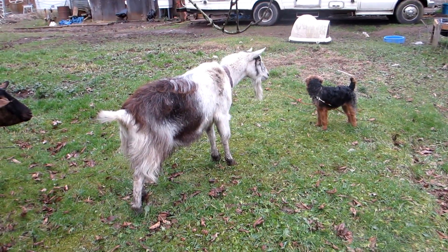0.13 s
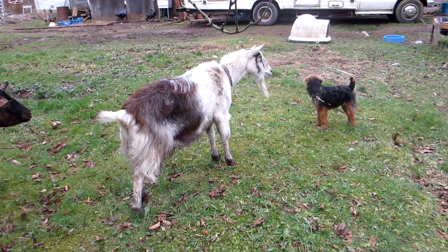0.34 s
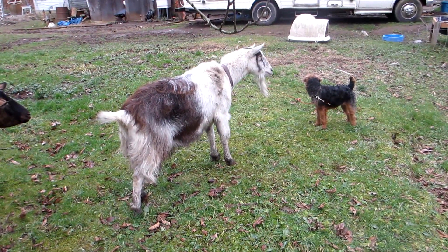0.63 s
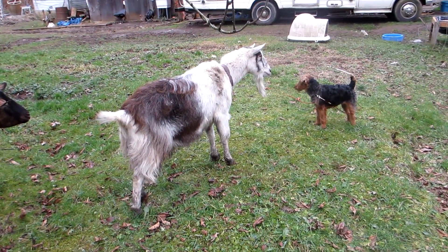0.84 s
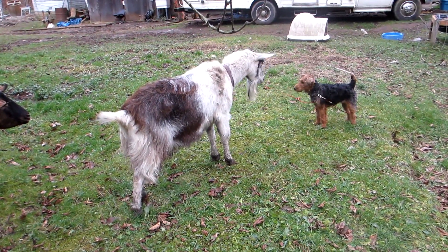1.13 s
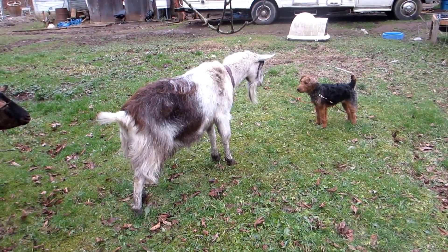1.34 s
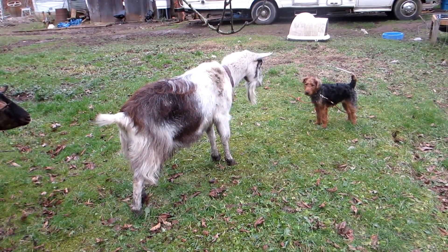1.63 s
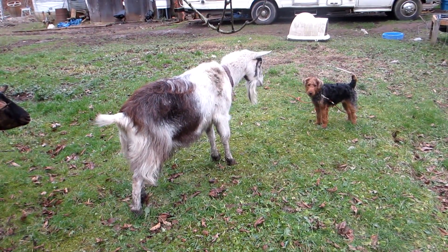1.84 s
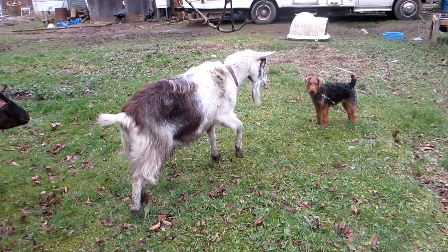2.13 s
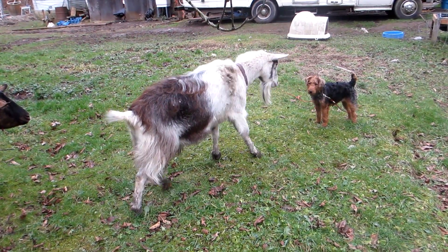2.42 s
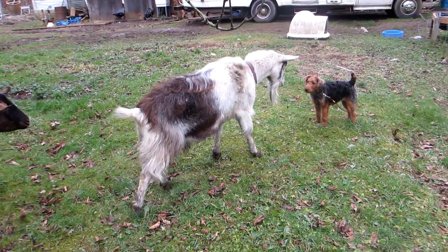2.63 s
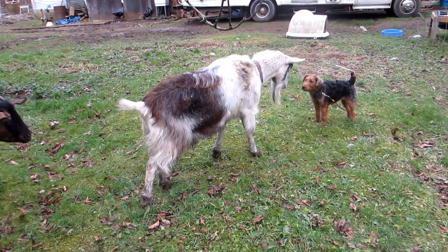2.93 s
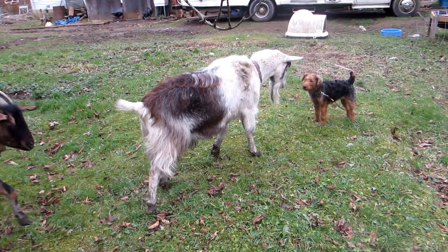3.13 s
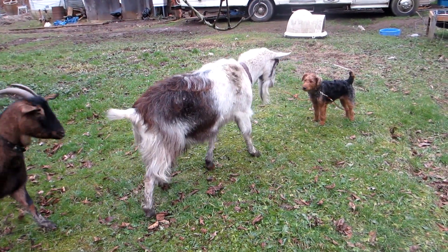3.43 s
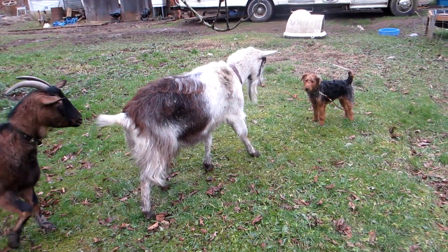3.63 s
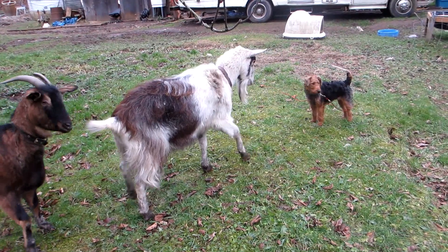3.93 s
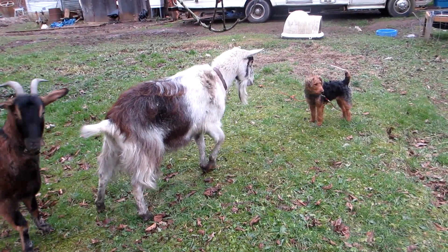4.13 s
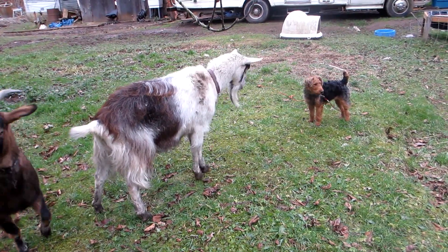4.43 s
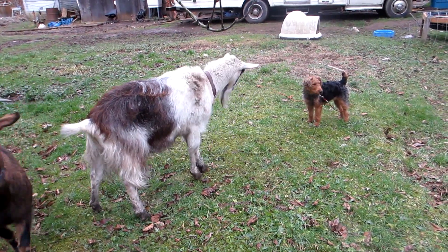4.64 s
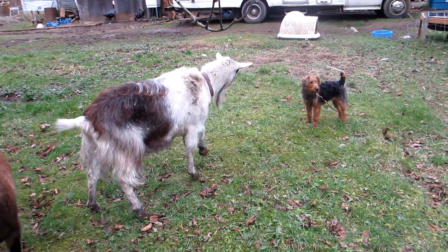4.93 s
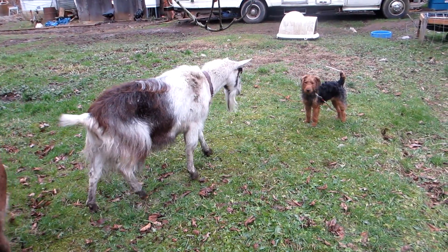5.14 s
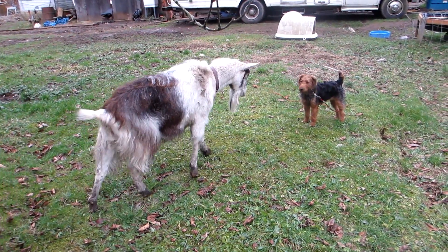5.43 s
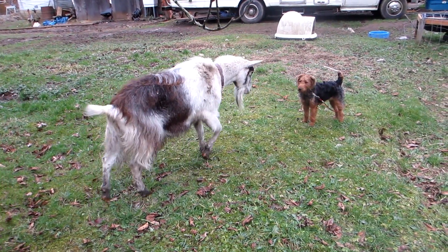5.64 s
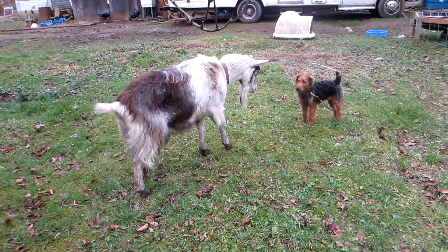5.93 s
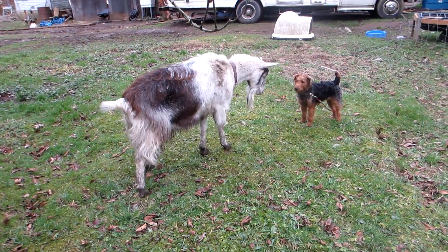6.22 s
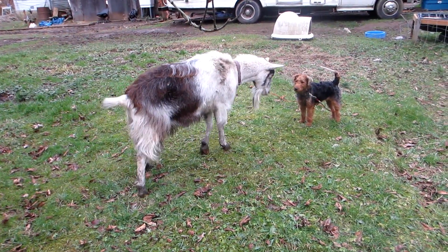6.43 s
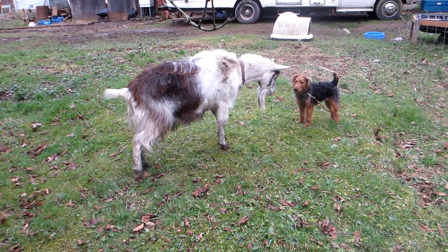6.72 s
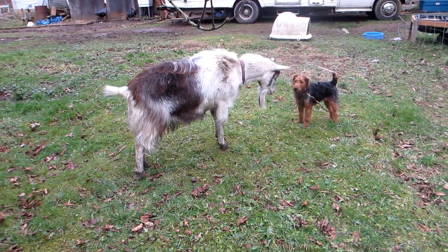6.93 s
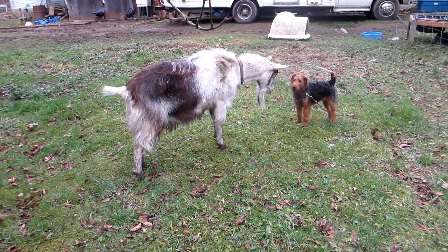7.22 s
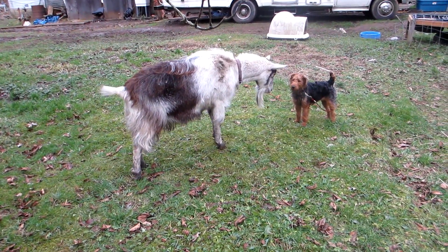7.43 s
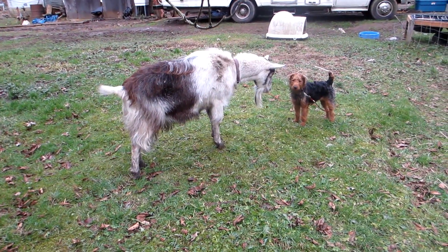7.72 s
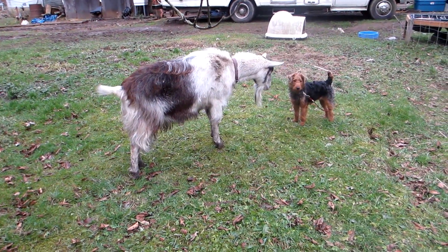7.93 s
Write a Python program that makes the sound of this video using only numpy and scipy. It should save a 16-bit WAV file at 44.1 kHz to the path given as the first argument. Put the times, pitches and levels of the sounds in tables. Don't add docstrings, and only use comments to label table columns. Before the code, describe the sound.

A heavy truck beyond a farmyard pulls hard, shifts up twice and settles to a lower drone while goats rustle grass and snap dry leaves nearby.

```python
import sys
import numpy as np
from scipy import signal
from scipy.io import wavfile
from scipy.ndimage import uniform_filter1d

SR = 44100
rng = np.random.default_rng(int(sys.argv[2]) if len(sys.argv) > 2 else 0)


def gain_from_db(level_db):
    decades = np.asarray(level_db, float) / 20
    return 10 ** decades


def inscribe(sig):
    pcm = np.round(np.clip(np.atleast_2d(sig).T, -1, 1) * 32767)
    wavfile.write(sys.argv[1], SR, pcm.astype(np.int16))


N = 355446
T = np.arange(N) / SR

# time in seconds, firing rate in Hz.
ENGINE = [(0, 82.54), (0.42, 91.7), (0.73, 96.25), (0.87, 90.45), (1.14, 73.1), (1.4, 62.2), (1.67, 56.28),
          (2.03, 58.23), (3.14, 71.9), (3.87, 82.15), (4.63, 90.5), (5.43, 98), (6.06, 65), (6.31, 57.97),
          (6.49, 59.4), (6.7, 69.94), (7.0, 65.96), (8.06, 68.7)]
# opening in seconds, shutting in seconds.
PULLS = [
    (-1, .8),
    (1.95, 5.3),
    (6.5, 9),
]


def exhaust():
    # time in seconds, level in dB.
    load_rows = [(0, -13.5), (.45, -5), (.75, -4), (1, -5.5), (1.7, -8.5), (2.05, -2), (2.6, -5),
                 (3.3, -4.5), (3.8, -2), (4.6, -1), (5.38, -1), (5.5, -4), (6.1, -16), (6.7, -11),
                 (8.06, -16)]
    # time in seconds, level in dB.
    boom_rows = [(0, -23.5), (.4, -28.5), (.7, -33.5), (.81, -25), (1.3, -24.5), (1.6, -32), (1.93, -34),
                 (2.15, -28), (2.58, -21), (3.5, -20.5), (4.1, -20), (4.6, -27.5), (4.95, -20.5),
                 (5.5, -22), (6.2, -25), (6.67, -21), (7.3, -21), (8.06, -31)]
    # time in seconds, change in dB, spread in seconds.
    fade_rows = [(.49, -17, 0.051), (.75, -15, .015), (.87, -5.5, .025), (.99, -3.5, .02), (1.1, -7, 0.016),
                 (1.38, 0.5, .02), (1.48, -2, 0.017), (1.59, -2, .015), (3.67, -11.5, 0.052),
                 (4.48, -5.5, 0.036), (5.19, -9, 0.095), (5.38, -4, 0.046), (5.53, -6, 0.017),
                 (5.65, -4, .015), (5.825, -15, 0.02), (5.96, -1.5, .03), (6.04, 6, 0.022),
                 (3.22, -0.5, .06), (1.93, -1, 0.023), (1.68, -8, .02), (4.75, -2, .05),
                 (6.12, -8.5, 0.018), (6.37, -8.5, 0.014), (6.48, -8.5, 0.083), (6.8, -3, 0.0269),
                 (7.32, -3, 0.03), (7.54, -2, 0.031), (7.8, -0.5, 0.037), (7.93, -6, 0.028)]
    # frequency in Hz, gain in dB.
    silencer = [(110, -3), (153, 5.5), (185, -5.5), (212, -3.5), (268, 3.5), (300, -3), (400, -.5)]
    # multiple of the firing rate, level in dB.
    upper_orders = [(.5, -18), (1.5, 5), (2.5, -1.5), (3.5, -11.5), (4, 0.5), (4.5, -10), (5, -2.5)]
    # time in seconds, order, change in dB, spread
    # in seconds.
    patch_rows = [(0.36, 2, -6, 0.24), (1.097, 2, -6, 0.095), (1.36, 2, 5, 0.041), (1.9, 2, -8, 0.068),
                  (2.65, 2, -7, 0.082), (3.37, 2, 3, 0.21), (3.8, 2, -5.5, 0.04), (2.97, 2, -7, .05),
                  (4.3, 2, -3, 0.071), (5.72, 2, -4.5, 0.087), (7.43, 2, -6, 0.53), (.1, 3, -4, 0.091),
                  (.48, 3, 4, 0.15), (2.65, 3, 1, 0.22), (3.4, 3, 9.5, 0.043), (4.51, 3, 3, 0.071),
                  (4.7, 3, -4.5, 0.062), (8, 3, 3.5, 0.35), (0.57, 2.5, 4.5, 0.31), (2.4, 4, -11, 0.37),
                  (3.95, 4, 2.5, 0.13), (4.75, 4, 2.5, 0.12), (4.8, 4, -3, 0.089), (3.703, 5, 4.5, 0.11),
                  (5.1, 5, -3.5, 0.12), (7.4, 3, 6, 0.1), (0.87, 2, 2.5, .08), (1.8, 4, 6.5, .1),
                  (5.95, 4, -3, .1), (5.47, 4, 1, .2), (5.25, 4.5, 29, 0.17), (1.7, 2.5, -10, .08),
                  (2.6, 3, -1, 0.023), (2.9, 4, -6, .12), (3.5, 5, -7, 0.26), (.15, 2.5, -12, 0.092),
                  (8.8, 4, 6, .3), (7.7, 4, -5, .1), (2.124, 4, 7.5, 0.11), (2.48, 2, 2.5, 0.064),
                   (2.7, 4, -6, .08), (6.8, 5, 13, .5), (7.75, 3, 6, 0.34), (0.71, 4, 1.5, 0.11),
                   (0.28, 4, 8, .1), (0.69, 3, -1, .04), (1.01, 3, -4.5, .07), (1.8, 3, -5, .1),
                   (1.545, 3, 8.5, 0.075), (1.45, 4, 8.5, .12), (2.356, 3, 6, 0.09), (4.5, 4, 2, .06),
                   (5.1, 3, -4, 0.044), (4.09, 4, -4.5, 0.12), (2.9, 4, 7, .15), (3.4, 2, 0.5, .1),
                   (3.5, 3, 0.5, .1),
                  (.5, 1.5, -6.5, 0.51), (1.8, 1.5, -5.5, 0.26), (2.75, 1.5, 6, 0.17), (4.37, 2, 7, 0.054),
                   (2.07, 2, 4, 0.047), (4.0, 2, 2.5, 0.049), (4.6, 2, -4, 0.074), (5.25, 2, -6, .05),
                   (4.43, 3, 1.5, 0.067), (2.8, 3, -7, .04), (3.65, 3, -6, .025), (4.35, 4, -6, 0.096),
                   (3.33, 4, -9, .08), (.03, 4, -10, .1), (3.8, 4, 4, 0.044), (4.55, 5, 4, .08),
                   (4.92, 5, 3.5, .08), (2.85, 1, 1, 0.13), (2.7, 2, -2, .04), (3.89, 4, 2.5, .1),
                   (4.7, 4, 3, 0.074), (6.35, 2, 5, .1), (6.72, 3, 5, .1), (6.2, 2, 6, .04),
                   (6.92, 3.5, 22.5, .05), (6.55, 3.5, 19, .08), (5.6, 3, -6.5, .08), (5.98, 4, -6, .05),
                   (8, 4, -6, .08)]

    firing_hz, load_db = curves(ENGINE, T)[0], curves(load_rows, T)[0]
    turns = np.cumsum(firing_hz) / SR
    whole_db = -40 + 1.63 * load_db
    half_db = -44.5 - 12 * ramp(T, 3.4, 4.1)
    orders = [(1, curves(boom_rows, T)[0] + bumps(fade_rows))]
    for k, full_load_db, load_share in ((2, -30.5, 0.9), (3, -34, 1.04)):
        orders.append((k, full_load_db + load_share * load_db + read(silencer, k * firing_hz)))
    for k, db in upper_orders:
        pipe_db = 3 * np.exp(-(np.log(k * firing_hz / 245) / 0.073) ** 2)
        base_db = half_db if round(2 * k) % 2 else whole_db
        orders.append((k, db + base_db + pipe_db))

    slope_hz_per_s = uniform_filter1d(np.gradient(firing_hz), size=4000) * SR
    coasting = np.clip(-slope_hz_per_s / 25, 0, 1)
    out = np.zeros((2, N))
    for k, db in orders:
        ragged = coasting * (k > 1)
        flutter_db = (.4 * k + 2.2 * ragged) * drift(top_hz=14) - 4 * ragged
        phase = 2 * np.pi * (k * turns + rng.random()) + (.05 * k + .7 * ragged) * drift(top_hz=9)
        skew = 0.13 * np.sqrt(k) * (1 + 0.62 * drift(top_hz=6.7))
        order_changes = patch_rows
        change_db = bumps([(s, d, spread) for s, order, d, spread in order_changes if round(2 * order) == 2 * k])
        out += np.sqrt(2) * gain_from_db(db + flutter_db + change_db) * np.cos(phase + np.outer([1, -1], skew))
    return out


def thumps():
    # start in seconds, peak in dB, frequency in Hz, t60 in seconds.
    thump_rows = [
        (0.771, -26, 69, 0.36),
        (5.432, -23, 59, 0.46),
    ]
    out = np.zeros(N)
    for s, db, hz, t60_s in thump_rows:
        t = np.maximum(T - s, 0)
        attack = 1 - np.exp(-t / 0.0057)
        out += gain_from_db(db - 60 * t / t60_s) * attack * np.sin(2 * np.pi * hz * t)
    return out


def rasp():
    # multiple of the firing rate, level in dB.
    high_orders = [(6, -52.5), (7, -55), (8, -55), (9, -54), (10, -53)]
    # middle in seconds, dB, spread in seconds, centre in Hz, width in Hz.
    rush_rows = [
        (0, -67, 0.061, 3700, 6000),
        (1, -77, .4, 5500, 4000),
        (3, -60, 0.59, 2100, 380),
        (3, -66.5, 0.087, 2900, 1200),
        (5.08, -48, 0.13, 910, 130),
        (0.02, -52, .08, 1100, 350),
        (0.8, -53, 0.14, 1046, 130),
        (5.5, -53.5, 0.17, 1640, 200),
        (7, -54, .35, 1000, 290),
    ]
    firing_hz = curves(ENGINE, T)[0]
    turns, slack_hz = np.cumsum(firing_hz) / SR, 98 - firing_hz
    shut_db = -9 * (1 - throttle(T))
    gate = 0.35 + 0.65 * 2 * np.cos(np.pi * turns) ** 4
    out = gain_from_db(-53 + shut_db + 1.9 * drift(top_hz=6.2)) * band(910, 380) * gate
    for k, db in high_orders:
        phase = 2 * np.pi * k * turns + .8 * drift(top_hz=9)
        out += gain_from_db(db - 0.4 * slack_hz + shut_db + 2.9 * drift(top_hz=10)) * np.cos(phase)
    for s, db, spread, centre_hz, width_hz in rush_rows:
        out += bumps([(s, gain_from_db(db), spread)]) * band(centre_hz, width_hz)
    return out


def gear_whine():
    # time in seconds, frequency in Hz.
    mesh_rows = [(0, 1430), (.2, 1480), (.45, 1550), (.76, 1625), (.86, 1540), (.96, 1432), (1.1, 1385),
                 (1.67, 950), (2.03, 985), (3.14, 1215), (3.9, 1365), (4.2, 1430), (4.6, 1530),
                 (4.95, 1605), (5.25, 1655), (5.45, 1680), (6.2, 1000), (8.06, 1140)]
    # frequency in Hz, level in dB.
    casing = [(1000, -65), (1110, -55), (1200, -62), (1330, -63), (1400, -50), (1460, -49.5), (1550, -51),
              (1650, -58)]
    # time in seconds, change in dB, spread in seconds.
    swell_rows = [(.17, 4, 0.046), (.25, -6, .025), (.87, -5, .04), (.36, -1.5, .1), (4.28, -4, .03),
                  (.55, -3, 0.089), (.78, 1.5, .04), (.97, 8, .04), (1.08, 4, .05), (3.7, -5, 0.13),
                  (4.15, -0.5, 0.055), (4.36, 5, .025), (4.55, -1.5, 0.081), (4.75, 3.5, .06),
                  (5.15, 4, .08), (.68, 1, 0.053)]
    gear_hz = uniform_filter1d(curves(mesh_rows, T)[0], size=2000)
    fuzz = resonate(resonate(rng.standard_normal(N), gear_hz, 70), gear_hz, 70)
    tone = np.cos(2 * np.pi * np.cumsum(gear_hz) / SR)
    whine_db = read(casing, gear_hz) - 12 * (1 - throttle(T)) - 12 * (T > PULLS[-1][0])
    waver_db = .8 * drift(top_hz=10) - 1.5 + bumps(swell_rows)
    return gain_from_db(whine_db + waver_db) * (.9 * evened(fuzz) + .65 * tone)


def turbo():
    # start in seconds, peak in seconds, gone in seconds, peak level in dB.
    spool_rows = [
        (-.2, 0.748, 1.2, -77.5),
        (2.2, 2.6, 5.9, -72),
    ]
    idle_db, hold_s = -86, 1.2
    level_db = idle_db * np.ones(N)
    for s, top, end, db in spool_rows:
        spool_down = ramp(T, min(top + hold_s, end - .2), end)
        level_db += (db - idle_db) * (ramp(T, s, top) - spool_down)
    hiss = rng.standard_normal((2, N)) + .8 * rng.standard_normal(N)
    return gain_from_db(level_db) * evened(resonate(resonate(hiss, 6200, 800), 6200, 800))


def intake():
    # middle in seconds, level in dB.
    vent_rows = [
        (.97, -63),
        (5.73, -60.5),
    ]
    slack_hz = 98 - curves(ENGINE, T)[0]
    rush = gain_from_db(-69 - 0.5 * slack_hz) * band(3200, 450)
    vent_s = 0.11
    return rush + bumps([(s, gain_from_db(db), vent_s) for s, db in vent_rows]) * band(2560, 600)


def road():
    # time in seconds, level in dB.
    roar_rows = [(0, -40), (.2, -43.5), (1, -42.5), (1.7, -46), (2.3, -45.5), (3, -45), (5, -41),
                 (5.75, -42.5), (7.1, -43), (8.06, -43.5)]
    # frequency in Hz, density in dB per Hz.
    roar_spectrum = [(12, -34.5), (20, -24.5), (47, -18.5), (69, -7), (103, -3.5), (164, -10.5),
                     (230, -8.5), (413, -13), (900, -21.5), (1400, -25), (1920, -32), (3000, -44),
                     (4000, -54.5), (6500, -66.5)]

    def roar_db(hz, t):
        bright_db_per_octave = 2 - 0.75 * t + 1.5 * throttle(t)
        bright_db = bright_db_per_octave * np.clip(np.log2(hz / 1500 + 1e-9), 0, 1.1)
        mid_cut_db = 1.5 * (1 - throttle(t)) * np.clip(np.log2(hz / 700 + 1e-9), 0, 1)
        return read(roar_spectrum, hz) + bright_db - mid_cut_db

    return gain_from_db(curves(roar_rows, T)[0] + 9) * noise(roar_db, size=2048, patchy_db=1.3)


def leaves():
    # start in seconds, peak in dB, centre in Hz, left-right in dB.
    snap_rows = [(0.043, -48, 8980, 0.0), (0.0914, -51.5, 9250, -1), (0.17, -53.5, 10100, -4),
                 (0.2198, -49, 9460, -0.5), (0.2919, -45.5, 9150, 1.5), (0.3416, -54, 9100, -1),
                 (2.008, -44, 9500, -7), (2.439, -47.5, 10400, -6), (2.534, -47, 11080, -3.5),
                 (2.5528, -43, 10210, -7), (3.033, -49, 10400, -5), (3.1257, -51, 10620, -7.5),
                 (3.1749, -49, 8300, -7), (3.5532, -47, 9610, 1.5), (3.5865, -48, 7770, -1),
                 (3.6627, -47, 7897, -2.5), (3.82, -50, 7700, -4.0), (3.9045, -45.5, 10500, -2),
                 (4.4023, -44.5, 11420, -5), (4.4838, -53, 9313, 2), (4.7152, -43, 7700, -2),
                 (4.853, -42, 9500, -4.5), (5.5285, -48.5, 10640, -5), (5.9677, -45.5, 10810, -1),
                 (6.413, -50.5, 10490, -4), (6.4697, -48.5, 7734, -1), (6.4967, -50, 8860, -4.5),
                 (6.529, -51.5, 10190, -10),
                 (3.8185, -46, 13000, -2), (4.7154, -44, 12500, -4), (.066, -58, 10000, 0),
                  (1.9773, -53, 9000, -3), (2.5276, -54, 9505, -3), (2.5895, -51, 9790, -3),
                  (3.0006, -53, 9500, -3), (3.1552, -48.5, 10500, -3.5), (3.4695, -53, 9000, -2),
                  (3.7823, -52, 9500, -2), (3.812, -54, 10000, -2), (3.9429, -44.5, 11500, -3),
                  (4.2792, -53, 8500, -1), (4.6249, -54.5, 8013, -7), (4.6653, -56, 7900, -1),
                  (4.6882, -53, 8000, -5), (4.708, -53, 9000, -2), (4.73, -54, 9500, -2),
                  (4.7661, -47, 11700, -1), (4.9067, -55, 9210, -3), (5.0694, -55, 8500, -2),
                  (5.2545, -52, 8500, -4), (5.7558, -60, 12000, -2), (5.8272, -48, 9690, -2),
                  (5.9554, -57, 12500, -3), (6.1047, -57, 9500, -1), (6.2696, -52, 9670, -3),
                  (6.3574, -56, 9500, -2), (3.9125, -49, 10500, -2), (3.9236, -47, 10500, -2),
                  (3.9362, -44.5, 11000, -3), (3.6059, -46, 9500, -1), (5.5405, -50, 10000, -3),
                  (5.8368, -51, 9500, -2), (5.2764, -50, 9500, -3), (3.5134, -52, 9500, 0)]
    twig_rows = [(2.0086, -39, 2500, -4), (3.5219, -27.5, 2520, 2), (3.819, -27, 2497, -2),
                 (3.9048, -37, 2496, -1.5), (4.7156, -33, 2497, -3), (5.52, -40, 2498, -7),
                 (5.5404, -45, 2500, -3), (5.7925, -38, 2497, 1.0), (.2919, -44, 3000, 0),
                 (.0432, -47, 3000, 0), (.2198, -46, 3000, -1), (3.524, -37, 1500, 0),
                 (3.5366, -43, 2500, -0.5), (4.4, -41, 2500, -2)]
    pip_rows = [
        (5.786, -51, 12500, -3),
        (5.791, -47, 12400, -5),
        (5.855, -49, 8000, 1),
        (5.7925, -53, 5000, 0),
        (4.7156, -51, 5500, -2),
    ]
    # ring width in Hz, puff in s
    snaps = [(*row, 7000, .00007) for row in twig_rows]
    snaps += [(*row, 1800, .0006) for row in pip_rows]
    snaps += [(*row, 6000, .0005) for row in snap_rows]
    out, t = np.zeros((2, N + 400)), np.arange(400) / SR
    for s, db, hz, pan_db, width_hz, puff_s in snaps:
        puff = rng.standard_normal((3, 400))
        ring = np.exp(-np.pi * width_hz * t) * t * np.sin(2 * np.pi * hz * t)
        burst = (puff[2] + 0.27 * puff[:2]) * t * np.exp(-t / puff_s)
        snap = signal.fftconvolve(burst, ring[None])[:, :400]
        at = round(s * SR)
        out[:, at:at + 400] += gain_from_db(db + np.array([[pan_db], [-pan_db]]) / 2) * snap / abs(snap).max()
    return out[:, :N]


def grass():
    # middle in seconds, level in dB, spread in seconds, centre in Hz.
    swish_rows = [(2.012, -80.5, 0.021, 9140), (2.543, -61.5, .013, 9340), (3.02, -69.5, .025, 10480),
                  (3.16, -72.5, 0.044, 11050), (3.36, -73, .015, 9930), (3.46, -71, 0.025, 9560),
                  (3.53, -66, .015, 8800), (3.592, -57, .007, 8040), (3.61, -56.5, .009, 8600),
                  (5.74, -70.5, 0.081, 4500), (5.8, -69, .02, 4800), (3.596, -59.5, .01, 5600),
                  (3.61, -60, .02, 3200), (3.8, -66, .014, 9480), (3.89, -64.5, .02, 8950),
                  (3.944, -59.5, 0.017, 10950), (4.283, -66, 0.011, 8400), (4.705, -69.5, 0.015, 9950),
                  (4.772, -60.5, 0.0098, 11520), (4.91, -66, 0.011, 9550), (5.07, -74, .015, 9000),
                  (5.27, -67.5, 0.019, 9970), (5.325, -66.5, .022, 8400), (5.531, -66, 0.011, 9050),
                  (5.62, -72.5, 0.026, 10100), (5.79, -64.5, .02, 10350), (5.84, -63, 0.012, 8990),
                  (5.96, -72, .013, 9930), (6.15, -77.5, .012, 12930), (6.275, -66, 0.017, 8950),
                  (6.6, -71.5, 0.036, 9960), (6.75, -74.5, 0.049, 9180)]
    hz, t = np.fft.rfftfreq(128, 1 / SR)[:, None], np.arange(N // 32 + 5) * 32 / SR
    still_db, shuffle_db = -87, -76.5
    stirring = ramp(t, 2.23 - .4, 2.23 + .4) - ramp(t, 6.3 - .2, 6.3 + .2)
    shuffle_power = gain_from_db(2 * (still_db + (shuffle_db - still_db) * stirring))
    power = shuffle_power * np.exp(-(np.log(hz / 10000 + 1e-9) / 0.83) ** 2)
    for s, db, spread, centre_hz in swish_rows:
        swell = gain_from_db(2 * db) * np.exp(-((t - s) / spread) ** 2 / 2)
        power = power + swell * np.exp(-(np.log(hz / centre_hz + 1e-9) / .42) ** 2)
    blades = gain_from_db(2.0 * evened(uniform_filter1d(rng.standard_normal(N), size=60)))
    hiss = noise(lambda *_: 10 * np.log10(power / power.mean(0) + 1e-9), size=128, patchy_db=2.5)
    return np.interp(T, t, np.sqrt(5.8 * power.mean(0))) * evened(hiss * blades)


def wind():
    sos = signal.butter(2, [25, 55], "bandpass", fs=SR, output="sos")
    low = signal.sosfilt(sos, rng.standard_normal((2, N)))
    return gain_from_db(-42.5 + 3.1 * drift(top_hz=4.6)) * evened(low)


def air():
    # frequency in Hz, density in dB per Hz.
    air_spectrum = [(1500, -20.5), (4000, -0.5), (6200, -2), (7500, -4.5), (9200, -3.5), (11000, -5),
                    (13000, -6.5), (15800, -6.5)]
    return gain_from_db(-72.5) * noise(lambda hz, t: read(air_spectrum, hz) + 0 * t, size=1024, patchy_db=-2.0)


def throttle(t):
    open_s, shut_s = 0.49, 0.27
    return sum(ramp(t, on, on + open_s) - ramp(t, off, off + shut_s) for on, off in PULLS)


def noise(db_of, size, patchy_db):
    # frequency in Hz, left-right likeness (0 to 1).
    likeness = [(40, 0.48), (80, 0.67), (250, 0.88), (600, 0.73), (1500, 0.7), (5000, 0.4), (12000, 0.15)]
    # frequency in Hz, left-right in dB.
    balance_rows = [(60, 2.5), (200, -1.5), (700, -1.5), (2500, -3), (5000, 0), (9000, -2)]
    frames, hz = 4 * N // size + 5, np.fft.rfftfreq(size, 1 / SR)[:, None]
    a, b, c, d, patches = rng.standard_normal((frames, len(hz), 5)).T
    patches = uniform_filter1d(uniform_filter1d(patches, size=8, axis=0), size=8, axis=1)
    same, left = np.clip(read(likeness, hz), -1, 1), a + 1j * b
    z = np.array([left, same * left + np.sqrt(1 - same ** 2) * (c + 1j * d)])
    lean_db = read(balance_rows, hz) / 2
    field_db = db_of(hz, np.arange(frames) * size / 4 / SR) + patchy_db * evened(patches)
    z *= gain_from_db(field_db + np.array([lean_db, -lean_db]))
    return evened(signal.istft(z, nperseg=size, noverlap=3 * size // 4)[1][:, :N])


def band(hz, width_hz):
    sos = signal.butter(2, [hz - width_hz / 2, hz + width_hz / 2], "bandpass", fs=SR, output="sos")
    return evened(signal.sosfilt(sos, rng.standard_normal((2, N)) + rng.standard_normal(N)))


def resonate(x, hz, width_hz):
    turn = np.exp(2j * np.pi * np.cumsum(hz * np.ones(N)) / SR)
    r = np.exp(-np.pi * width_hz / SR)
    return 2 * (turn * signal.lfilter([1 - r], [1, -r], x / turn)).real


def drift(top_hz):
    t = T[::256]
    slow = sum(np.sin(2 * np.pi * (f * t + rng.random())) for f in np.geomspace(top_hz / 20, top_hz, 24))
    return np.interp(T, t, evened(slow))


def bumps(rows):
    t = T[::64]
    return np.interp(T, t, sum((h * np.exp(-((t - s) / spread) ** 2 / 2) for s, h, spread in rows), 0 * t))


def ramp(t, start, stop):
    return np.clip((t - start) / (stop - start), 0, 1)


def curves(rows, t):
    s, *columns = np.transpose(rows)
    return [np.interp(t, s, c) for c in columns]


def read(points, hz):
    f, value = np.transpose(points)
    return np.interp(np.log(hz + 1), np.log(f + 1), value)


def evened(x):
    return x / np.sqrt(np.mean(x ** 2) + 1e-20)


def scene():
    truck = exhaust() + thumps() + rasp() + gear_whine() + turbo() + intake() + road()
    goats = leaves() + grass()
    return truck + goats + wind() + air()


def top_cut(x):
    return signal.sosfilt(signal.butter(12, 15830, fs=SR, output="sos"), x)


def record(dry):
    low_pass = signal.firwin(401, 15770, window=("kaiser", 9), fs=SR)
    padded = np.pad(dry, ((0, 0), (200, 200)), "reflect")
    limited = signal.oaconvolve(padded, low_pass[None], "valid")
    high_pass = signal.butter(2, 31.6, "highpass", fs=SR, output="sos")
    return top_cut(signal.sosfilt(high_pass, limited))


dry = scene()
out = record(dry)
inscribe(out)
```